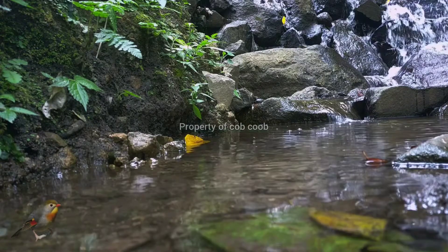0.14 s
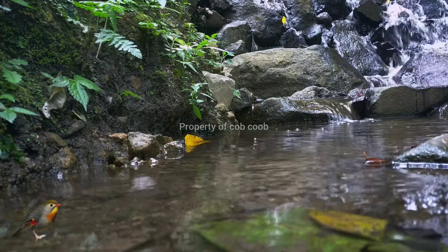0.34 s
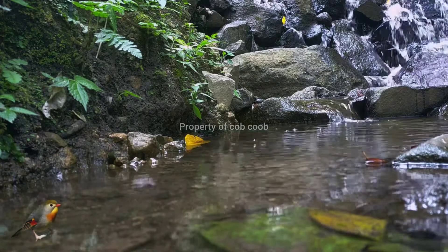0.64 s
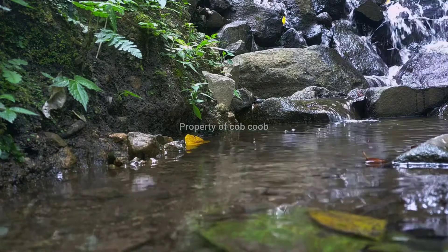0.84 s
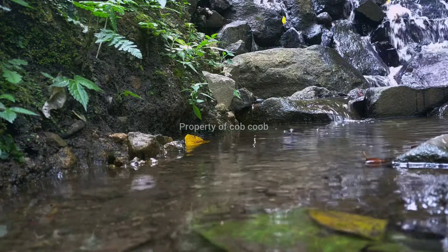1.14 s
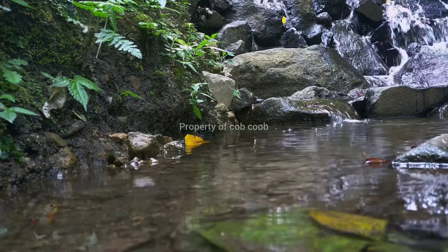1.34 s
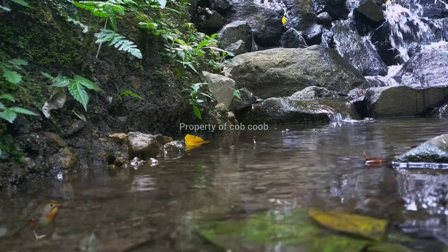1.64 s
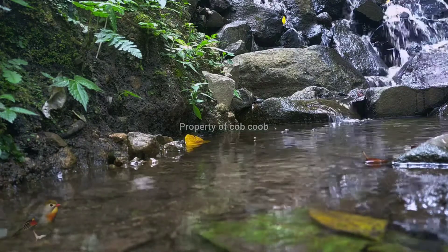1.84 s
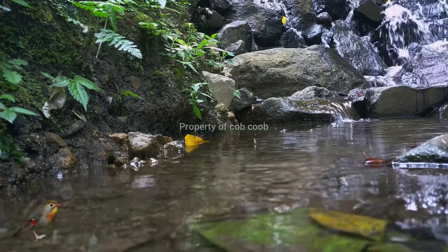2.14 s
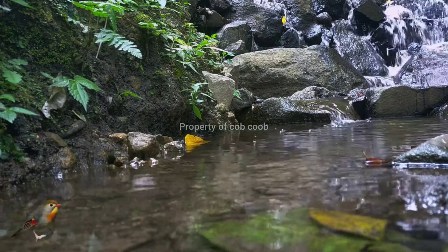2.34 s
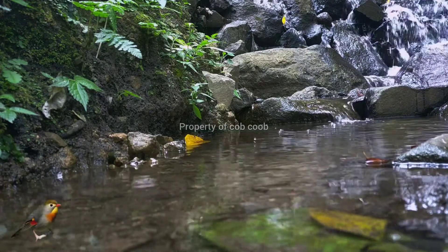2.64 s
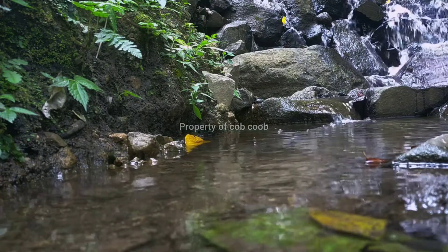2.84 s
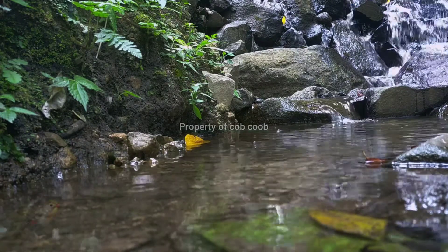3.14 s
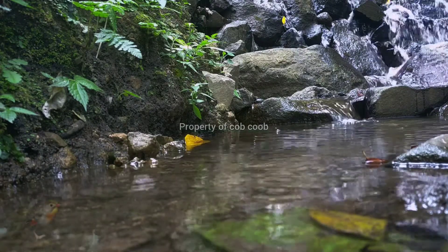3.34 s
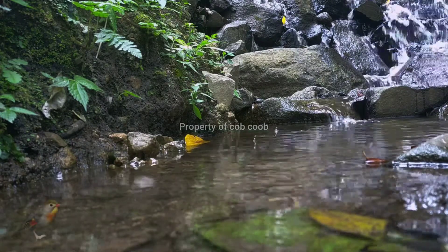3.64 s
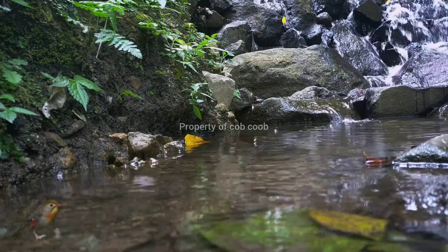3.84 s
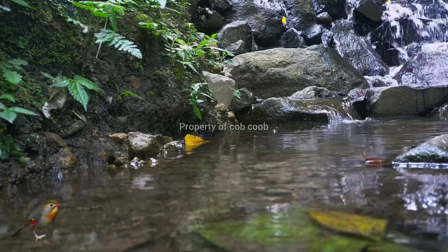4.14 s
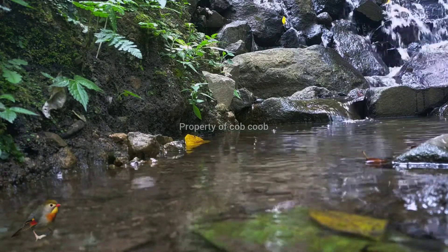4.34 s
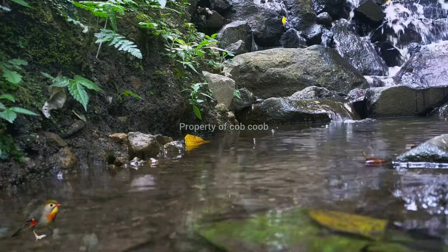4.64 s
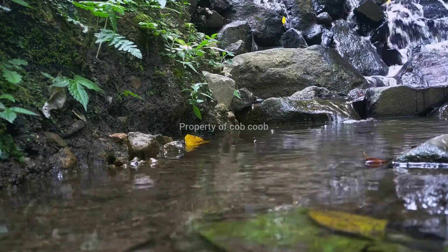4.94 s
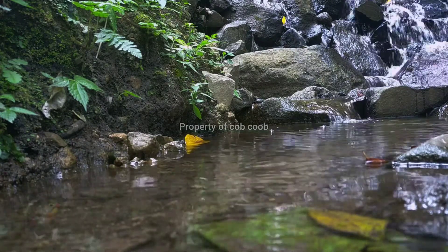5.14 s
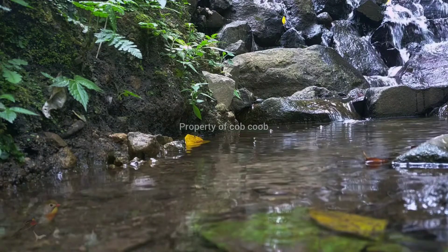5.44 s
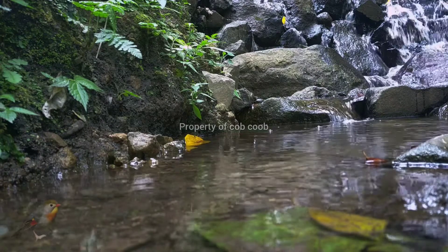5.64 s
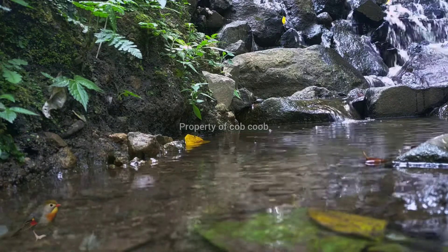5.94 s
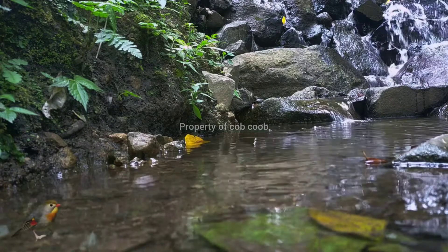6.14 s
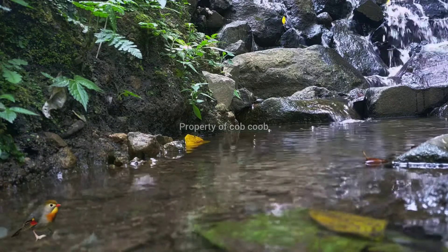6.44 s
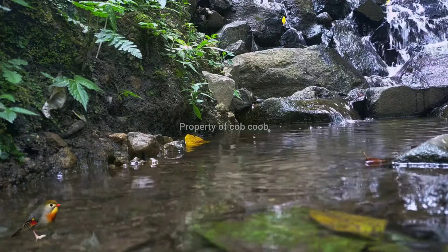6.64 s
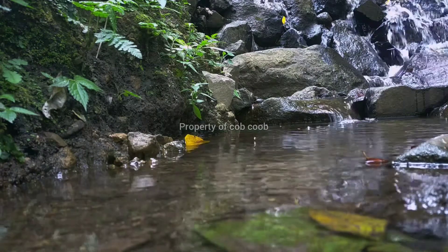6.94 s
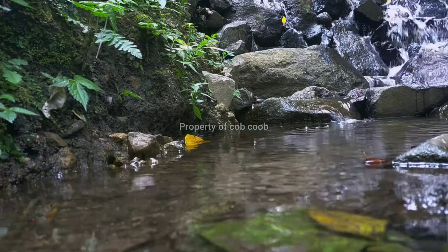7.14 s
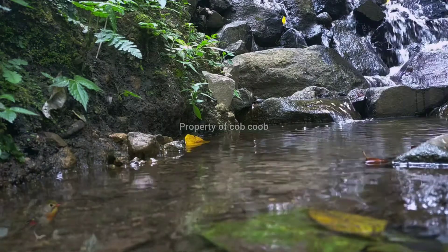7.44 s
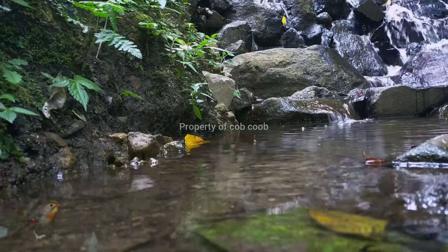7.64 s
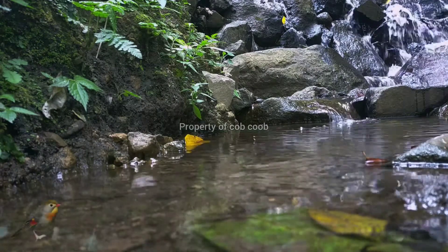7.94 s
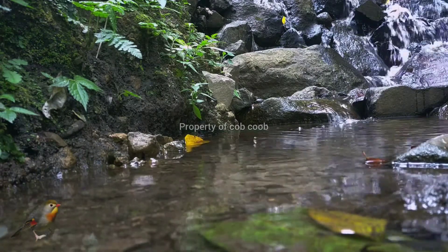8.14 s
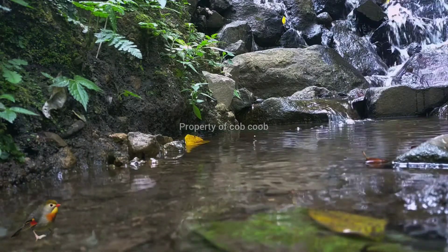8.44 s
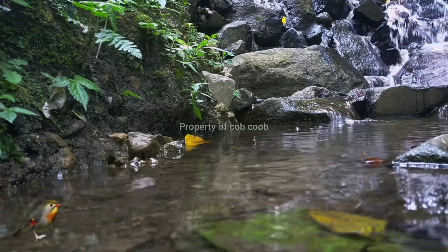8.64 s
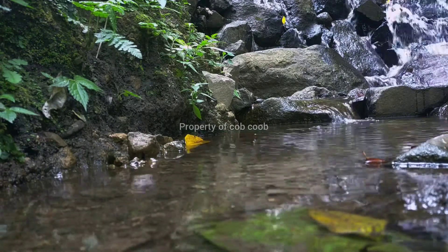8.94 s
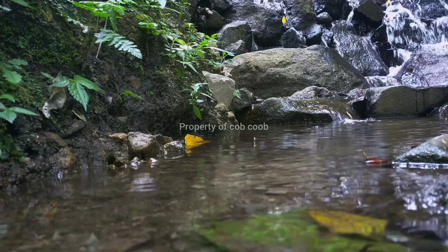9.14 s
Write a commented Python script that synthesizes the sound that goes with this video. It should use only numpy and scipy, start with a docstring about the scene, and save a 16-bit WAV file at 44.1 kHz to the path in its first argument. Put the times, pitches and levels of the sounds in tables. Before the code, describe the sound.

Beside a small forest stream, water rushes evenly throughout. A bird ahead whistles a quick warbled phrase at once, then a similar one after a pause; later another answers from the right. Each note leaves a short gully echo. Light wind buffets an outdoor stereo microphone, while a faint cricket and a very high insect continue beneath.

```python
"""Two songbirds whistle in an echoing gully: one ahead sings two warbled phrases, one on the right bank the third.
Each whistle is a near sine with flickering overtones, followed by single early echoes and a convolved tail.
The stream and the deep falls are shaped noise; bubbles, plops, drips and one far peep are decaying sines.
Wind on the microphone is bass noise in lumps and gusts; a cricket is a gliding sine heard first on the left,
and a high insect on the right is narrow-band noise that rises in pitch and restarts."""
import sys
import numpy as np
from scipy import signal
from scipy.fft import rfft, irfft
from scipy.io import wavfile
from scipy.ndimage import uniform_filter1d

SR = 44100
rng = np.random.default_rng(int(sys.argv[2]) if len(sys.argv) > 2 else 0)


def bounce(signal):
    """Save signal as a 16-bit WAV file at the path given by the first command-line argument."""
    frames = np.transpose(np.atleast_2d(signal))
    limited = np.clip(frames, -1, 1)
    pcm = np.round(limited * 32767).astype(np.int16)
    wavfile.write(sys.argv[1], SR, pcm)


N = 409248  # samples
EDGE_HZ = 15690  # upper band limit
STREAM_DB = -40.5  # rms of the stream over both sides
BUZZ_START_S, BUZZ_PERIOD_S = .4, .73  # a moment when the insect's repeating cycle begins, and its length
THUD_PITCH = .75  # a deep thud has the buffeting spectrum this much lower

# Smooth-glide notes. Each row: start in seconds, length in seconds, nominal first and last pitch in Hz,
# glide middle and glide span as shares of the length, onset level and peak level in dB,
# peak place as a share of the length, end level in dB, perch (0 ahead, 1 bank). Levels precede the perch gain.
PLAIN_NOTES = [(0.0, .118, 2570, 2690, .2, .5, -16, -13.5, .5, -32, 0),
               (3.654, .066, 2670, 1380, .76, .3, -27, -13, .42, -56, 0),
               (3.757, .115, 2470, 2430, .4, .9, -26, -21, .3, -30, 0),
               (4.104, .135, 1850, 3420, .72, .95, -28, -16, .55, -24, 0),
               (4.347, .175, 2530, 2670, .25, .7, -22, -18, .5, -27, 0),
               (7.608, .132, 2560, 2750, .38, .7, -30, -14.5, .55, -20, 1),
               (8.012, .093, 2500, 1560, .66, 1.15, -34, -23, .45, -36, 1),
               (8.153, .1, 2300, 2590, .42, .35, -26, -11.5, .57, -30, 1),
               (8.533, .102, 2260, 2390, .55, .35, -30, -17, .6, -24, 1),
               (8.638, .107, 1300, 1900, .16, .55, -40, -21, .45, -30, 1)]
# Warbled syllables by name. Each row: age in seconds, pitch in Hz, level in dB, before the changes of a singing.
SYLLABLES = { "dip": [(0, 2520, -12), (.009, 2130, -7), (.019, 1790, -5), (.038, 1470, -25),
             (.058, 1960, -16), (.082, 2320, -9), (.113, 2400, -6), (.135, 2200, -3), (.155, 2030, 0),
             (.175, 1970, -15)], "climb": [(0, 1830, -25), (.015, 1930, -9), (.028, 2440, -13),
             (.039, 1980, -6), (.062, 2060, -7), (.075, 2660, -7), (.098, 2860, 0), (.128, 2950, -12),
             (.14, 2940, -32)], "hook": [(0, 2010, -12), (.015, 2010, -3), (.032, 1770, -9),
             (.051, 1610, -17), (.066, 1930, -6), (.077, 2520, -8), (.1, 2320, 0), (.125, 2300, -3),
             (.155, 2260, -22)], "rasp": [(0, 2150, -17), (.01, 2500, -15), (.02, 2900, -5),
             (.045, 2950, 0), (.062, 2850, -4), (.085, 2760, -5)], "step": [(0, 2580, -18),
             (.014, 2710, -3), (.054, 2777, -1), (.061, 2950, -7), (.097, 2870, 0), (.108, 2690, -3),
             (.128, 2670, -14)]}
# Singings of each syllable. Each row: start in seconds, slowness factor, pitch factor,
# level in dB before the perch gain, perch (0 ahead, 1 bank).
SINGINGS = {"dip": [(.299, .96, 1.001, -15, 0), (4.691, 1.07, .999, -17, 0)],
            "climb": [(.607, .99, 1.005, -10, 0), (4.996, 1.01, .995, -11, 0)],
            "hook": [(.836, 1.01, .985, -15, 0), (5.216, 1.1, 1.015, -15, 0)],
            "rasp": [(8.95, 1.001, 1.001, -10.5, 1)], "step": [(9.068, 1.001, 1.001, -9.5, 1)]}
# Fast pitch modulation. Each row: start in seconds, end in seconds, rate per second, depth in Hz before smoothing.
TRILLS = [(0.614, 0.669, 82, 180), (0.903, 0.978, 70, 190), (5.006, 5.064, 99, 170),
          (5.287, 5.356, 70, 130), (8.67, 8.75, 45, 50), (8.94, 9.04, 209, 540)]
# Overtones of the bird ahead. Each row: frequency in Hz, level in dB re a whistle whose own level is -12 dB.
AHEAD_OVERTONES = [(3000, -14.5), (5300, -32), (7700, -19.5), (8600, -49.5), (10500, -25.5), (12500, -33.5),
                   (15000, -40.5)]
# Overtones of the bird on the bank, with the same columns and reference.
BANK_OVERTONES = [(3000, -46), (5300, -36.5), (7700, -51), (9000, -35.5), (10800, -28.5), (12500, -36),
                  (15000, -39.5)]
# Single early echoes, the first arriving inverted. Each row: delay in seconds, level in dB re direct sound, sign.
EARLY_ECHOES = [(.00617, -4, -1), (.0146, -11, 1), (.039, -15, 1), (.0457, -14, 1)]
# Reverberation of the gully. Each row: frequency in Hz, time to fall 60 dB in seconds.
GULLY_DECAY = [(1500, .65), (2400, .85), (3200, .7), (5000, .35), (12000, .25)]
# Stream spectrum. Each row: frequency in Hz, relative spectral level in dB.
STREAM_SPECTRUM = [(88, -54), (150, -16), (230, -7.5), (404, -2.5), (812, -2.5), (1370, -7.5), (3040, -6.5),
                   (3550, -11.5), (4400, -10), (5140, -18.5), (6120, -9), (7430, -13), (11200, -29.5),
                   (11800, -26), (15500, -27.5)]
# Likeness of the water at the two sides. Each row: frequency in Hz, correlation from 0 to 1.
STREAM_LIKENESS = [(150, 0.66), (290, 0.85), (640, 0.44), (1300, 0.057), (2500, 0.12), (4000, 0.04),
                   (15000, .05)]
# Later arrival of the shared water sound on the right. Each row: frequency in Hz, delay in seconds.
RIGHT_DELAY = [(600, .0001), (1200, .00045)]
# Colour of the water on the right. Each row: frequency in Hz, level in dB re left.
RIGHT_COLOUR = [(300, 0.3), (700, -0.8), (2000, 0.2), (9000, -0.5), (13000, 5.5)]
# Wind pressure spectrum. Each row: frequency in Hz, relative spectral level in dB.
BUFFET_SPECTRUM = [(20, -40), (50, -11.5), (80, -4), (115, -0.5), (160, -9), (220, -18.5), (300, -24),
                   (400, -43)]
# Steady breeze. Each row: time in seconds, level in dB before the lumps.
BREEZE = [(0, -50), (2.4, -52), (3.4, -51), (3.9, -53), (4.6, -48), (5.6, -49), (6.5, -53), (9.28, -52)]
# Gusts. Each row: peak time in seconds, level in dB, time to drop 10 dB on either side in seconds,
# power share of deep thud from 0 to 1.
GUSTS = [(.52, -43, .05, .7), (.955, -33, .04, .6), (1.08, -43, .04, .4), (1.52, -39, .03, .5),
         (1.65, -41, .06, .5), (1.91, -44, .05, .5), (2.56, -37, .025, .02), (2.65, -26, .03, .02),
         (2.72, -31, .03, .02), (2.79, -38, .05, .02), (3.125, -34, .02, .02), (4.86, -36, .035, .8),
         (5.065, -23, .022, .05)]
# Plops, drips and one far peep (3270 Hz). Each row: start in seconds, pitch in Hz, level in dB before decay,
# time to fall 60 dB in seconds.
PLOPS_AND_PEEP = [(2.225, 2640, -29, .03), (2.255, 3270, -42, 0.4), (2.396, 391, -32, 0.14),
                  (5.483, 392, -31, 0.15), (6.49, 2200, -45, .03), (7.37, 2900, -48, 0.041),
                  (7.431, 2500, -30, 0.027), (8.579, 396, -31.5, 0.13)]
# Cricket chirp starts, in seconds.
CHIRP_STARTS = [.18, .86, 1.541, 2.221, 2.902, 3.9, 4.58, 5.262, 5.909, 6.581, 7.269]
# Course of one chirp. Each row: age in seconds, pitch in Hz, mean level in dB.
CHIRP = [(0, 2900, -82), (.02, 2840, -45), (.12, 2810, -49), (.15, 2780, -80), (.23, 2800, -80),
         (.26, 2790, -52), (0.38, 2770, -60)]
# Spectrum of the deep body of the falls. Each row: frequency in Hz, relative spectral level in dB.
RUMBLE_SPECTRUM = [(8.8, -35), (15, -12), (48, -7), (63, -7.5), (80, 6), (102, -20.5), (200, -10),
                   (260, -27), (440, -120)]
# Course of one insect cycle. Each row: age in seconds, pitch shift in Hz, relative level in dB.
BUZZ_CYCLE = [(0, -500, -12), (.15, -350, -3), (.48, 50, 0), (.52, 50, -25), (.72, -500, -25)]
# Noise bands of the insect. Each row: centre in Hz before the shift, width in Hz,
# level in dB before the cycle and side gains.
BUZZ_BANDS = [(12050, 500, -69), (13450, 500, -70)]


def birds():
    """Reverberation: echoes from ahead reach both ears alike; from the bank they differ at each ear."""
    ahead = song(notes(0), AHEAD_OVERTONES)
    ahead_tail = echoes(rise_s=.012, early_db=12.0, early_t60=.15)[0]
    ahead_wet = signal.fftconvolve(ahead, ahead_tail)[:N]
    ahead = gain_of(-0.4) * ahead + gain_of(-7.0) * ahead_wet

    bank = song(notes(1), BANK_OVERTONES)
    bank_tails = echoes(rise_s=.012, early_db=19.0, early_t60=.3)
    bank_wet = signal.fftconvolve(bank[None], bank_tails, axes=1)[:, :N]
    bank = gain_of(-2.5) * bank + gain_of(-5.5) * bank_wet
    return ahead + gain_of([[-1.3], [1.3]]) * bank  # the bank is louder on the right


def song(tracks, overtones):
    """Discrete echo: delayed copies, the first inverted, join one bird's direct line of notes."""
    line, returns = np.zeros(N), np.zeros(N)
    for rows in tracks:
        add(line, *whistle(rows, overtones))
    for delay, db, sign in EARLY_ECHOES:
        add(returns, delay, sign * gain_of(db) * line[:N - round(delay * SR)])
    return line + returns


def notes(perch):
    """Modulation in time: pitch and level tracks describe everything sung from one perch."""
    tracks = [plain(*row[:-1]) for row in PLAIN_NOTES if round(row[-1]) == perch]
    for name, singings in SINGINGS.items():
        tracks += [warble(SYLLABLES[name], *row[:-1]) for row in singings if round(row[-1]) == perch]
    return tracks


def plain(start, length, from_hz, to_hz, middle, span, onset_db, peak_db, place, end_db):
    """Frequency glide: pitch follows a smooth sine-squared step while the level swells to a peak and dies."""
    u = np.linspace(0, 1, num=40)
    way = np.clip((u - middle) / span + .5, 0, 1)
    hz = from_hz + (to_hz - from_hz) * np.sin(np.pi / 2 * way) ** 2
    dying = np.clip((u - place) / (1 - place), 0, 1) ** 2
    db = np.interp(u, [0, place], [onset_db, peak_db]) + (end_db - peak_db) * dying
    return np.transpose([start + length * u, hz, db])


def warble(shape, start, slowness, pitch, level_db):
    """Scaling of a learned syllable: time and pitch are stretched by factors, level is shifted."""
    return np.array(shape) * [slowness, pitch, 1] + [start, 0, level_db]


def whistle(rows, overtones, flutter_db=1.47, throb_db=5.0):
    """Frequency modulation: a near sine whose faint overtones are unsteady, the more the higher."""
    s, hz, db = np.transpose(rows)
    t = np.arange(s[0], s[-1], 1 / SR)
    hz = uniform_filter1d(np.interp(t, s, hz), size=150, mode="nearest")
    db = np.interp(t, s, db)
    # the faster the glide, the rougher the pitch, up to 90 Hz
    glide_hz_per_s = abs(np.gradient(hz)) * SR
    hz = hz + np.minimum(.004 * glide_hz_per_s, 90) * wobble(len(t), 220)
    hz = hz + 9 * wobble(len(t), 30)  # a held pitch wavers a little

    for start, end, per_s, depth in TRILLS:
        inside = np.clip(np.minimum(t - start, end - t) / 0.0083, 0, 1)
        beat = 2 * np.pi * per_s * (t - start) + 0.9 * wobble(len(t), 60)  # never quite regular
        hz = hz + inside * depth * signal.sawtooth(beat, .7)
        db = db - inside * throb_db * depth / 480 * (1 + np.cos(beat))  # dips at each lower turn

    phase = 2 * np.pi * np.cumsum(uniform_filter1d(hz, size=70, mode="nearest")) / SR
    jitter = 0.0506 * wobble(len(t), 330)  # radians, times harmonic number squared
    tone = np.sqrt(2) * np.sin(phase)
    for k in range(2, 9):
        # overtones flicker; their share rises with the whistle's level
        overtone_db = read(overtones, k * hz) + 3.96 * wobble(len(t), 40) + 0.2 * (db + 12)
        tone += (k * hz < EDGE_HZ) * gain_of(overtone_db) * np.sin(k * phase + k ** 2 * jitter)
    level = gain_of(db + flutter_db * wobble(len(t), 76))
    fade = np.clip(np.minimum(t - s[0], s[-1] - t) / 0.005, 0, 1)
    return s[0], tone * level * fade


def echoes(rise_s, early_db, early_t60):
    """Exponential decay of sparse taps: strong early returns over a longer ring of the trees."""
    taps = np.zeros((2, SR))
    at = np.arange(0, SR - 20, 20) + rng.integers(0, 20, (2, (SR - 1) // 20))  # one tap in each 20 samples
    np.put_along_axis(taps, at, rng.choice([-1., 1.], at.shape), 1)
    hz, t, z = signal.stft(taps, SR, nperseg=256)
    ring = gain_of(-60 * t / read(GULLY_DECAY, hz)[:, None])
    early = gain_of(early_db - 60 * t / early_t60)
    tail = signal.istft(z * (ring + early), SR, nperseg=256)[1]
    tail = tail * np.clip(np.arange(len(t) * 128 - 128) / SR / rise_s, 0, 1)
    return tail / np.linalg.norm(tail, axis=1, keepdims=True)


def stream(patchy_db=1.7, swell_db=0.07):
    """Superposition: countless bubbles merge into partly correlated noise with drifting patches."""
    frames, hz = N // 256 + 5, np.fft.rfftfreq(1024, 1 / SR)
    a, b, c, d, patches = rng.standard_normal((frames, 513, 5)).T
    patches = uniform_filter1d(patches, size=10, axis=0)  # across frequency
    patches = evened(uniform_filter1d(patches, size=12, axis=1))  # across time
    swell = evened(uniform_filter1d(rng.standard_normal(frames), size=40))

    same = read(STREAM_LIKENESS, hz)[:, None]
    late = np.exp(-2j * np.pi * hz * read(RIGHT_DELAY, hz))[:, None]
    left, other = a + 1j * b, c + 1j * d
    z = np.array([left, same * late * left + np.sqrt(1 - same ** 2) * other])
    level_db = read(STREAM_SPECTRUM, hz)[:, None] + patchy_db * patches + swell_db * swell
    z *= gain_of(level_db) * (hz > 60)[:, None]
    z[1] *= gain_of(read(RIGHT_COLOUR, hz))[:, None]
    return gain_of(STREAM_DB) * evened(signal.istft(z, nperseg=1024, noverlap=768)[1][:, :N])


def wind(lumps_db=2.1):
    """Turbulent pressure on the microphone: lumpy bass noise, alike in both channels, with single gusts."""
    t = np.arange(N) / SR
    push = gain_of(np.interp(t, *np.transpose(BREEZE)) + lumps_db * wobble(N, 9))
    thud = 0
    for s, db, drop_s, deep in GUSTS:
        gust = gain_of(np.maximum(db - 10 * ((t - s) / drop_s) ** 2, -200))
        push = push + np.sqrt(1 - deep) * gust
        thud = thud + np.sqrt(deep) * gust
    deep_spectrum = np.array(BUFFET_SPECTRUM) * [THUD_PITCH, 1]
    return low_noise(BUFFET_SPECTRUM) * push + low_noise(deep_spectrum) * thud


def plops_and_peep():
    """Damped oscillation: the clearest plops, drips and one far peep are decaying sines with a short rise."""
    line = np.zeros(N)
    for s, hz, db, t60 in PLOPS_AND_PEEP:
        t = np.arange(0, t60, 1 / SR)
        rise = np.minimum(t / t60 / 0.089, 1)
        add(line, s, gain_of(db - 60 * t / t60) * rise * np.sin(2 * np.pi * hz * t))
    return line


def cricket():
    """Arrival-time difference: paired thin chirps reach the right side about half a millisecond late."""
    s, hz, db = np.transpose(CHIRP)
    t, line = np.arange(0, s[-1], 1 / SR), np.zeros(N)
    for start in CHIRP_STARTS:
        phase = 2 * np.pi * np.cumsum(np.interp(t, s, hz)) / SR + 0.32 * wobble(len(t), 25)
        level = gain_of(np.interp(t, s, db) + 2.6 * wobble(len(t), 40))
        add(line, start, level * np.sqrt(2) * np.sin(phase))
    return np.array([line, np.roll(line, 20)])


def falls(mid_db=-52, side_db=-62):
    """Mid and side noise: a steady deep rumble, nearly the same at both sides."""
    middle, side = low_noise(RUMBLE_SPECTRUM), low_noise(RUMBLE_SPECTRUM)
    return gain_of(mid_db) * middle + gain_of(side_db) * side * [[1], [-1]]


def bubbles(per_s=60, level_db=-58, spread_db=5.5):
    """Resonance of larger single bubbles: short rings that glide upward, leaning left or right."""
    strength = gain_of(spread_db * np.minimum(rng.exponential(1, N), 4))
    size = strength * (rng.random(N) < per_s / SR)
    kind, out = rng.integers(0, 24, N), np.zeros((2, N))
    for k, hz in enumerate(np.geomspace(330, 2600, num=24)):
        cycle = np.arange(int(12 * SR / hz)) * hz / SR
        ring = np.sin(2 * np.pi * (cycle + 0.0066 * cycle ** 2))
        ring *= (1 - np.exp(-cycle)) * np.exp(-cycle / 6.7)
        out[k % 2] += signal.oaconvolve(size * (kind == k), ring)[:N]
    return gain_of(level_db) * evened(out + .5 * out[::-1])


def insect():
    """Narrow-band noise on moving carriers: a high hiss on the right climbs, stops short and restarts."""
    s, shift, db = np.transpose(BUZZ_CYCLE)
    age = (np.arange(N) / SR - BUZZ_START_S) % BUZZ_PERIOD_S
    out = np.zeros((2, N))
    for hz, width, level_db in BUZZ_BANDS:
        phase = 2 * np.pi * np.cumsum(hz + np.interp(age, s, shift)) / SR
        for side in out:
            hiss = wobble(N, width / 2) * np.cos(phase) + wobble(N, width / 2) * np.sin(phase)
            side += gain_of(level_db) * hiss
    return out * gain_of(np.interp(age, s, db)) * gain_of([[-6.0], [0.5]])


def low_noise(points):
    """Spectral shaping: white noise is weighted by a bass spectrum below 420 Hz and set to rms 1."""
    hz = np.fft.rfftfreq(N, 1 / SR)
    weight = gain_of(read(points, hz)) * (hz < 420)
    return evened(irfft(rfft(rng.standard_normal(N)) * weight, N))


def wobble(count, hz):
    """Low-pass noise: a smooth random drift up to about hz, rms 1."""
    lowpass = signal.butter(2, hz, fs=SR, output="sos")
    return evened(signal.sosfilt(lowpass, rng.standard_normal(count + 2000))[2000:])


def gain_of(db):
    """Logarithmic level: decibels become an amplitude factor."""
    return 10 ** (np.asarray(db) / 20)


def evened(x):
    """Normalisation: the signal is scaled to rms 1."""
    return x / np.sqrt(np.mean(x ** 2) + 1e-20)


def read(points, hz):
    """Interpolation on a logarithmic frequency axis of rows of frequency and value."""
    f, value = np.transpose(points)
    return np.interp(np.log(hz + 1), np.log(f + 1), value)


def add(mix, s, sound):
    """Superposition: a sound is added in place from time s in seconds."""
    part = mix[max(round(s * SR), 0):][:len(sound)]
    part += sound[:len(part)]


def scene():
    """Linear superposition of birds, water, wind and insects."""
    return birds() + stream() + wind() + plops_and_peep() + cricket() + falls() + bubbles() + insect()


def record(dry):
    """Band limitation of the recorder: a steep linear-phase low-pass at EDGE_HZ."""
    lowpass = signal.firwin(2047, EDGE_HZ, window=("kaiser", 10), fs=SR)
    return signal.oaconvolve(dry, lowpass[None], "same")


dry = scene()
out = record(dry)
bounce(out)
```